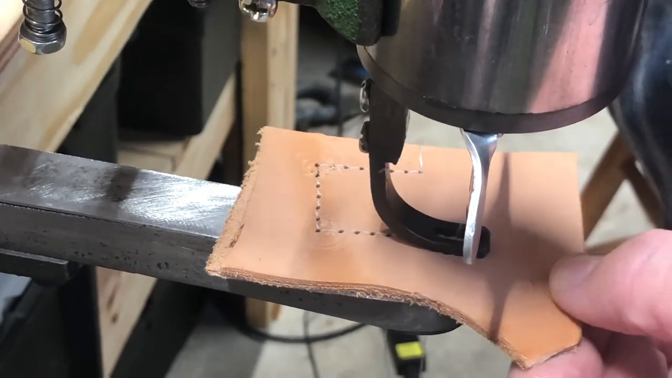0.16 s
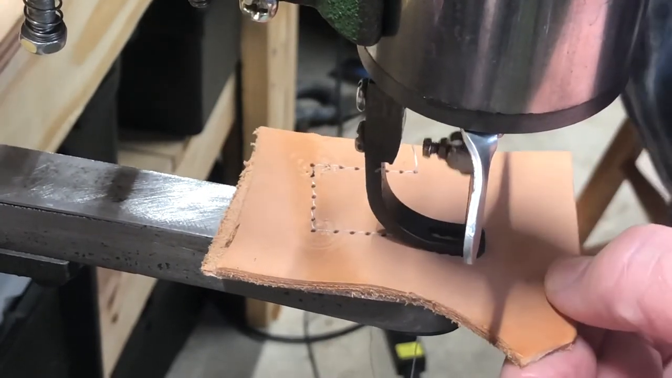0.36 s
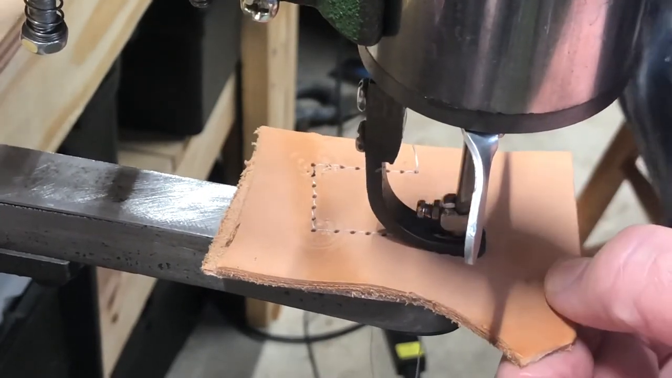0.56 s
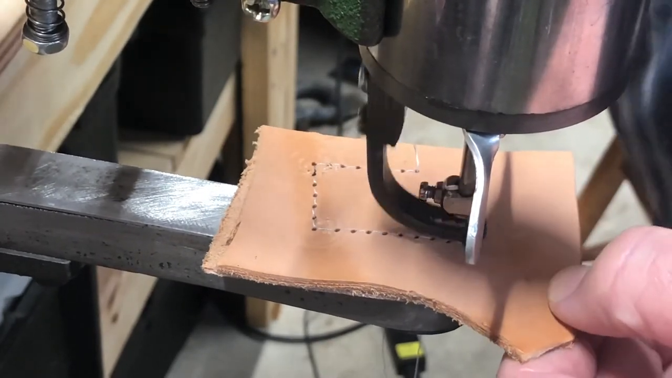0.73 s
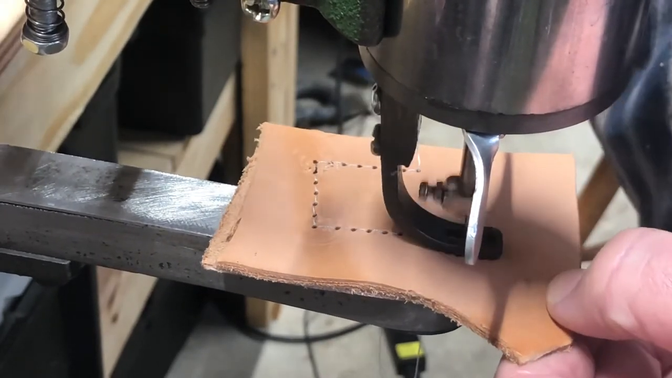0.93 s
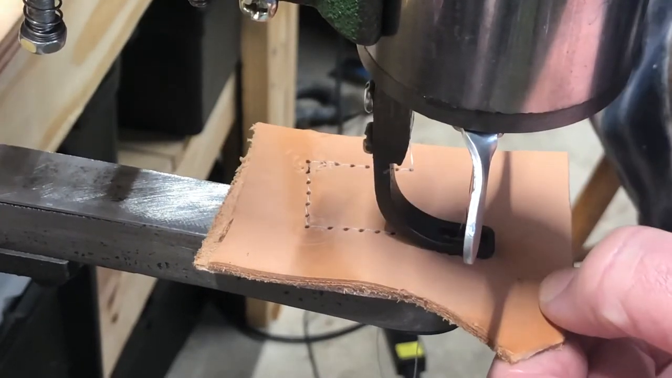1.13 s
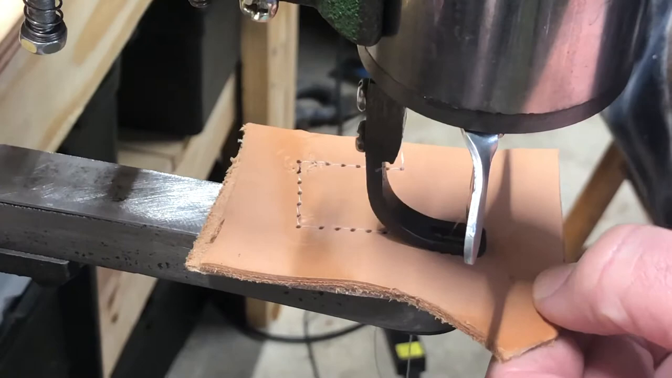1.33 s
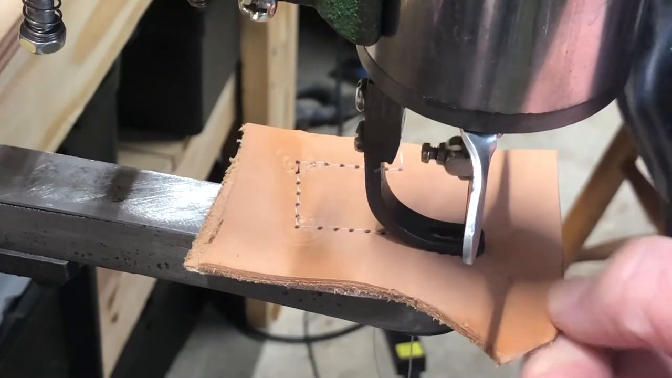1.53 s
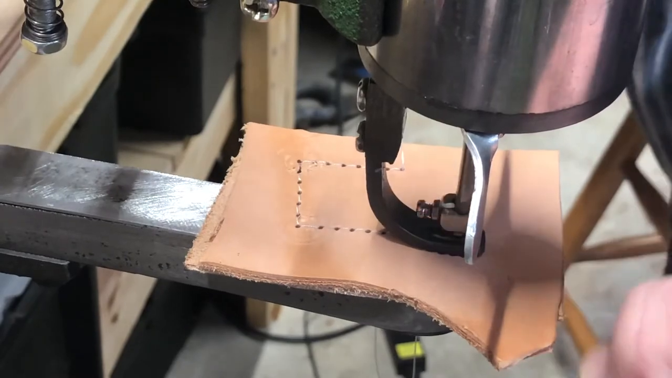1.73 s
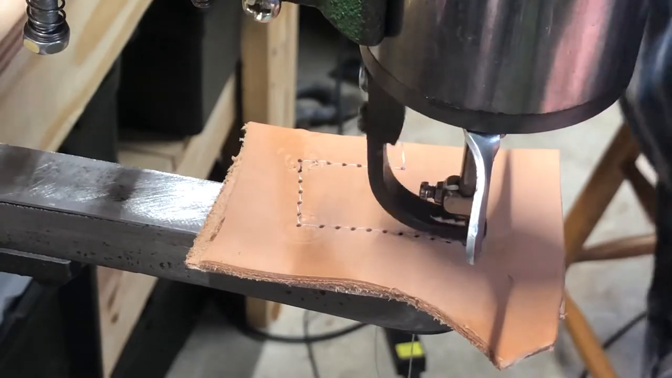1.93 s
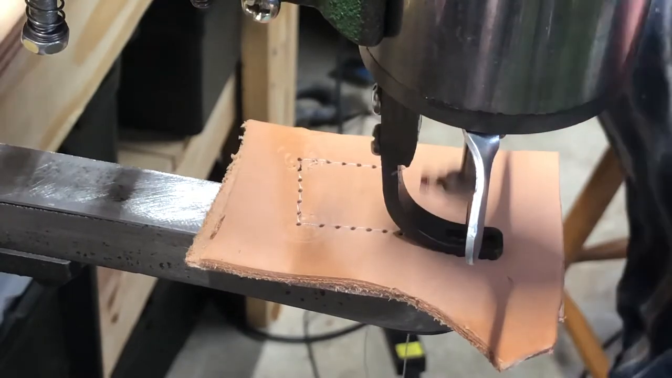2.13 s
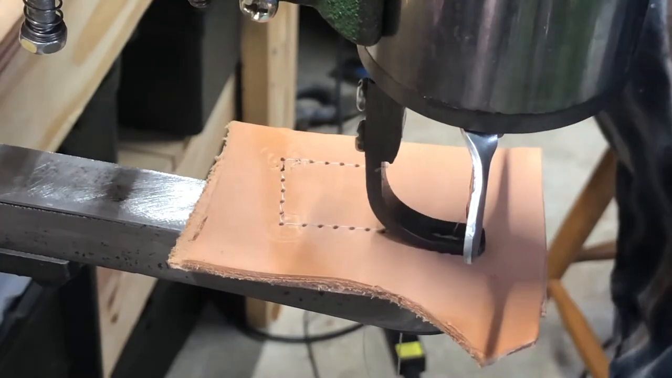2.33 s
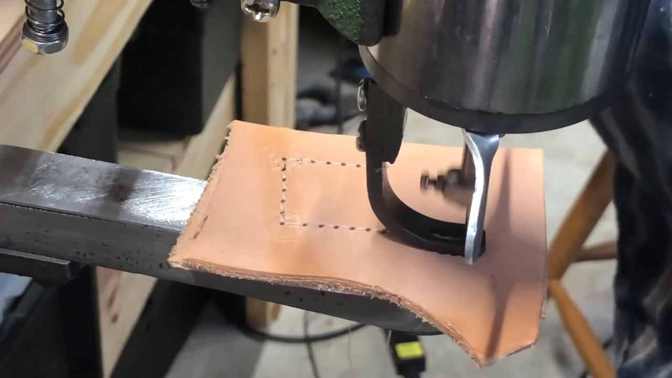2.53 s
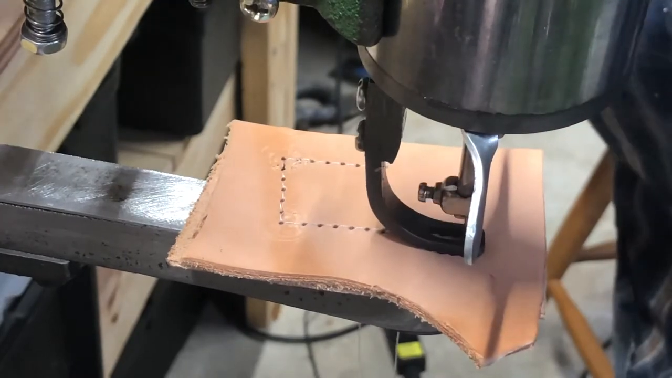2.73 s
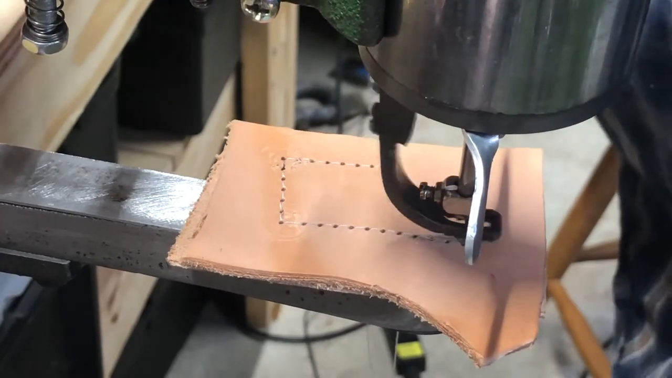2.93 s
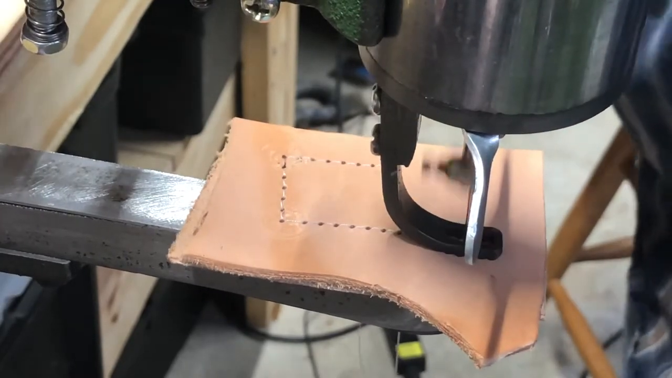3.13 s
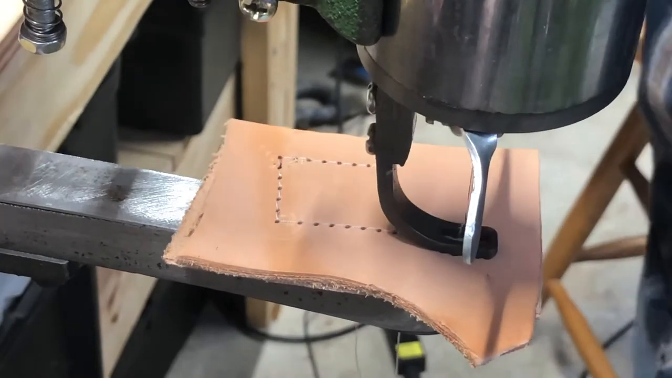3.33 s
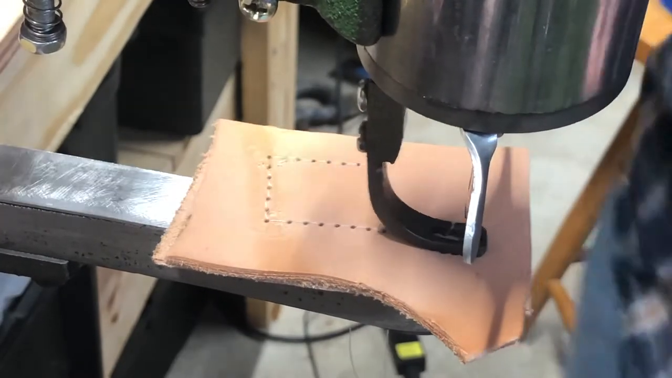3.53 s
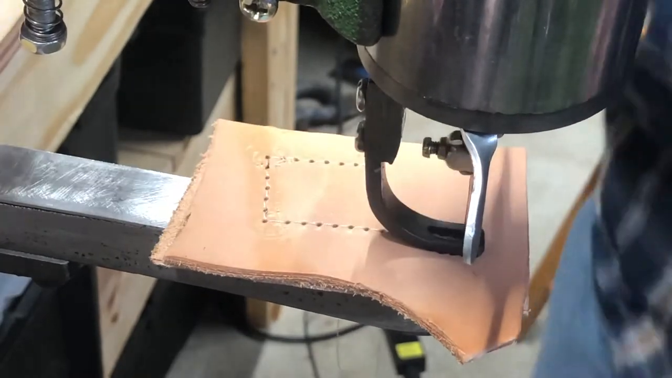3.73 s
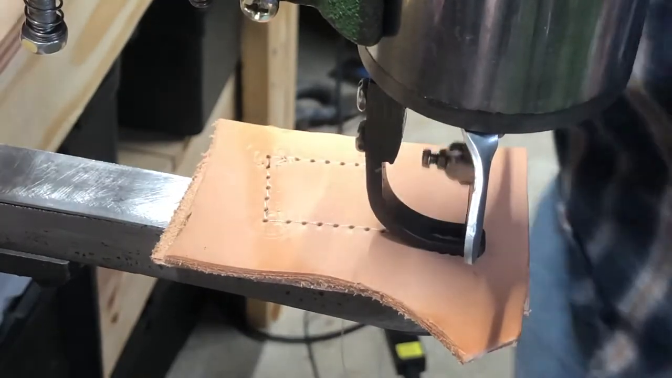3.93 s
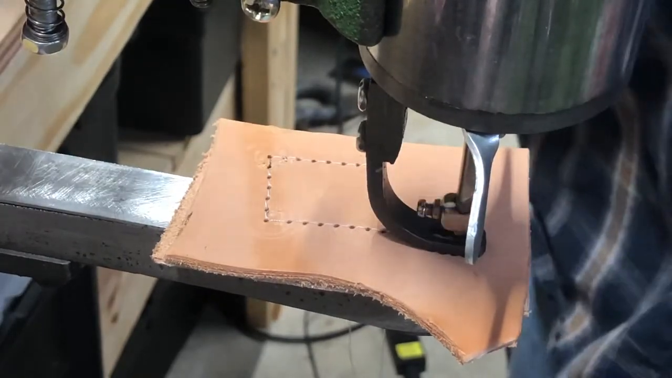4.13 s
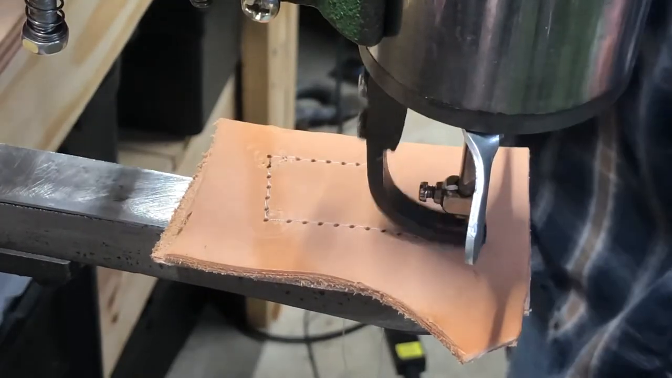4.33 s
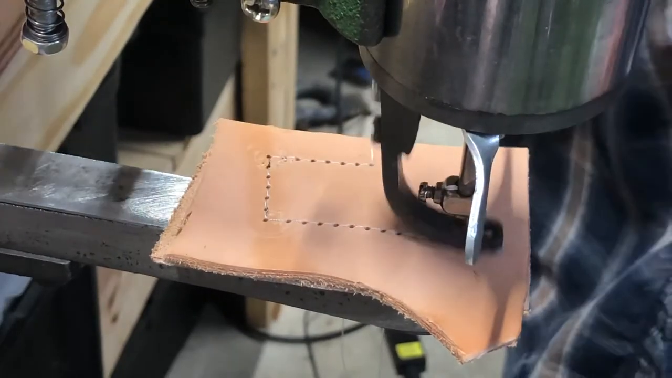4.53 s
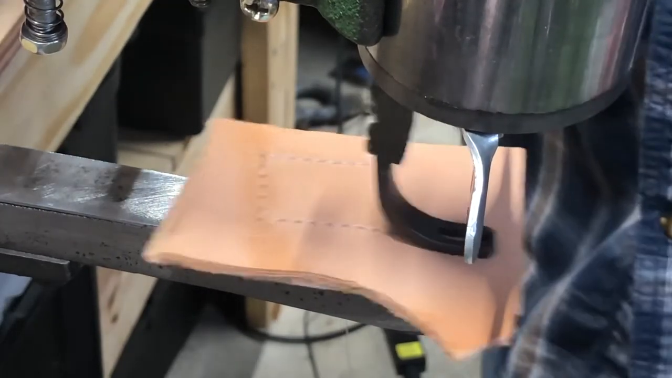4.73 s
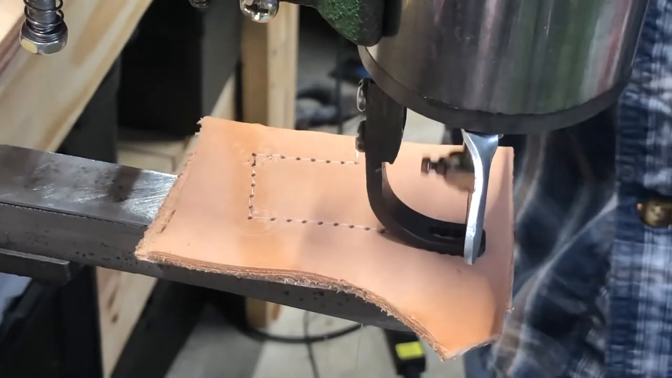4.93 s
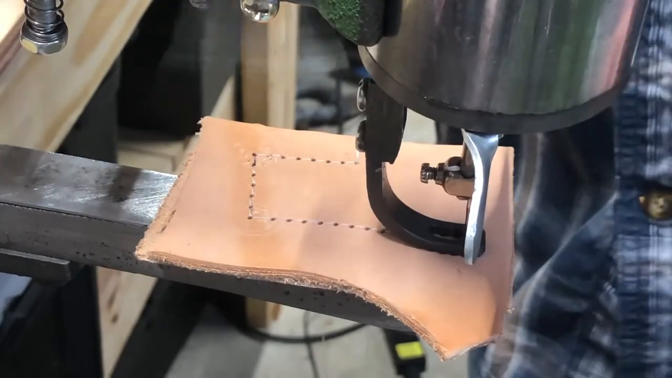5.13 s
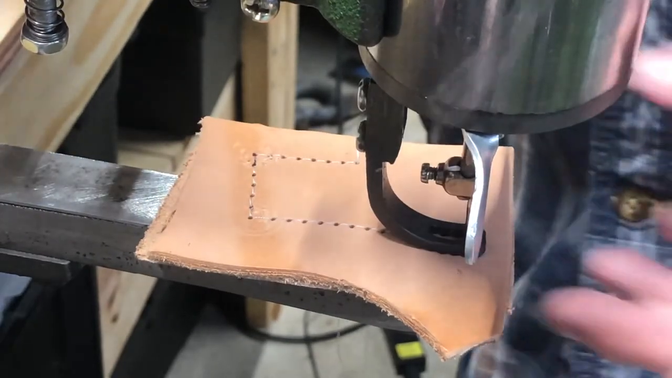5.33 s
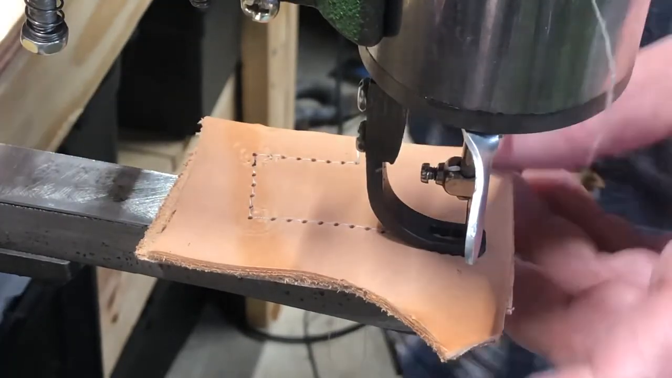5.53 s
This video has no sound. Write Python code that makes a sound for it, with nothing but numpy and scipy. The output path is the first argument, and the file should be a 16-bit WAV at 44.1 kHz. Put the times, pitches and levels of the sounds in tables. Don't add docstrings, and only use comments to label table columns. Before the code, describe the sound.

Close rhythmic metal clacking and gritty roller grinding, one heavy stroke per stitch, with small spring pings over a low room hum.

```python
import sys
import numpy as np
from scipy import signal
from scipy.fft import rfft, irfft, next_fast_len
from scipy.io import wavfile
from scipy.ndimage import uniform_filter1d, map_coordinates

SR = 44100
rng = np.random.default_rng(int(sys.argv[2]) if len(sys.argv) > 2 else 0)


def dump(signal):
    limited = np.clip(np.atleast_2d(signal).T, -1, 1)
    pcm = np.round(limited * 32767).astype(np.int16)
    wavfile.write(sys.argv[1], SR, pcm)


def gain_from_decibels(decibels):
    exponent = np.asarray(decibels, float) / 20
    return 10 ** exponent


N = 245637

# frequency in Hz, width in Hz, level in dB.
FRAME_MODES = [(305.7, 39, -1.5), (447, 78, -0.5), (543.4, 40.6, 1), (666, 119, -2), (863, 143, -3.5),
               (1140, 88, -3.5), (1470, 1000, -20)]


def unit(x):
    return x / np.sqrt(np.mean(x ** 2) + 1e-20)


def along(points, hz):
    f, v = np.transpose(points)
    return np.interp(np.log(hz + 1), np.log(f + 1), v)


def wobble(rate_hz):
    knots = rng.standard_normal(int(N * rate_hz / SR) + 4)
    return map_coordinates(knots, [np.arange(N) * rate_hz / SR])


def filtered(x, response):
    m = next_fast_len(N + SR // 2)
    return irfft(rfft(x, m) * response(np.fft.rfftfreq(m, 1 / SR)), m)[..., :N]


def resonant(modes):
    def response(f):
        total = 0
        for k, (center, width, db) in enumerate(modes):
            damping = 1j * f * width
            total = total + (-1) ** k * gain_from_decibels(db) * damping / (center * center - f * f + damping)
        return total / np.sqrt(np.mean(np.abs(total) ** 2))
    return response


def gritty(rate_hz, lump_db):
    return unit(gain_from_decibels(lump_db * wobble(rate_hz)) * rng.standard_normal(N))


def patchy(x, patch_db, size):
    z = signal.stft(x, nperseg=size)[2]
    field = uniform_filter1d(rng.standard_normal(z.shape), size=4, axis=0)
    field = uniform_filter1d(field, size=5, axis=1)
    return unit(signal.istft(z * gain_from_decibels(patch_db * unit(field)), nperseg=size)[1][:N])


def room_tone():
    # frequency in Hz, density in dB per Hz.
    tone_spectrum = [(12, -64), (20, -49), (37, -30), (53, -10.5), (72, -0.5), (88, -15), (101, -25),
                     (366, -29), (457, -35), (588, -38), (946, -43.5), (7270, -50.5), (15900, -56.5)]
    level_db = -51 + 1.8 * wobble(4)
    air = filtered(rng.standard_normal(N), lambda hz: gain_from_decibels(along(tone_spectrum, hz)))
    return gain_from_decibels(level_db) * unit(air)


def walls(x):
    # frequency in Hz, t60 in seconds.
    wall_t60 = [(300, 0.24), (3000, 0.025), (12000, 0.049)]
    delay = 250
    hz, t, z = signal.stft(rng.standard_normal(SR // 2), SR, nperseg=256)
    decay = gain_from_decibels(-60 * t / along(wall_t60, hz)[:, None])
    tail = signal.istft(z * decay, SR, nperseg=256)[1]
    return signal.fftconvolve(np.pad(x, (delay, 0)), tail / np.linalg.norm(tail))[:N]


def thread():
    # time in seconds, peak in dB.
    snap = [(5.3134, -30)]
    (s, db), = snap
    t = np.arange(N) / SR - s
    return -gain_from_decibels(db) * np.exp(-(t / .00033) ** 2) * np.cos(2 * np.pi * 1950 * t)


def effort():
    # start of hold in seconds, hold in seconds, grind in dB, scrape over grind in dB.
    feed = [(.13, 0.079, -42, -11.5), (1.265, 0.079, -43, -11), (2.27, 0.059, -37.5, -9.5),
            (3.49, 0.069, -41, -12.5), (4.71, 0.073, -42, -10)]
    lift = [(.4, 0.08, -43.5, -17), (1.545, 0.0067, -44.5, -12.5), (2.47, .03, -45.5, -15),
            (3.37, 0.055, -55.5, -3.5), (3.9, 0.012, -50.5, -23), (4.635, 0.036, -42.5, -2.5)]
    pierce = [(.505, 0.089, -31.5, -14.5), (1.675, 0.11, -34.5, -14.5), (2.555, 0.13, -35, -15),
              (4.11, 0.13, -37, -13)]
    pull = [(.68, 0.25, -36, -14), (1.91, 0.19, -35, -11), (2.915, 0.18, -36, -13),
            (4.32, 0.29, -36.5, -25.5)]
    brush = [(0, 0.0046, -52.5, -12), (3.22, 0.11, -64.5, -1.5), (3.64, 0.33, -60.5, -4),
             (5.09, 0.26, -65, 2.5), (5.53, 0.043, -77, -1)]
    # strokes, rise in dB/s, growth in the hold in dB/s, fall in dB/s.
    strokes = [(feed, 170, 42, 200), (lift, 345, 22, 150), (pierce, 300, 49, 198),
               (pull, 72, 16.1, 206), (brush, 120, 1.2, 280)]
    t = np.arange(N) / SR
    power = np.full((2, N), 1e-9)
    for rows, rise, growth, fall in strokes:
        for s, hold, db, scrape_db in rows:
            shape_db = rise * np.minimum(t - s, 0)
            shape_db += growth * np.clip(t - s, 0, hold)
            shape_db -= fall * np.maximum(t - s - hold, 0)
            power += gain_from_decibels(db + np.c_[[0, scrape_db]] + shape_db) ** 2
    return 10 * np.log10(power)


def crank():
    # frequency in Hz, width in Hz, level in dB.
    bench_modes = [(122, 12, 0), (187, 20, -8), (234, 26, -6)]
    idle_modes = [(344, 77, -2.5), (541, 141, -3.5), (718, 135, -1.5), (987, 290, -10.5), (1123, 52, -5.5),
                  (1434, 240, -19)]
    roller_modes = [(1960, 91, 10), (2623, 45, 19), (3610, 47, 13), (5250, 180, 12.5), (5950, 83, -52.5),
                    (8600, 350, -4.5)]
    # frequency in Hz, density in dB per Hz.
    scrape_spectrum = [(820, -19), (1400, 0), (1610, -9.5), (2060, -4.5), (2380, -5), (3430, -6),
                       (3690, -8.5), (6260, -12.5), (7220, -18.5), (9230, -15), (10400, -22), (14000, -27),
                       (16000, -23)]
    bench_level_db, bench_share, bench_lag_s = -44.5, .6, 0.016

    grind_db, scrape_db = effort()
    t = np.arange(N) / SR
    rolling = patchy(gritty(300, lump_db=4), patch_db=2.5, size=1024)
    rolling = gain_from_decibels(grind_db - 1.1 + 1.2 * wobble(22)) * rolling
    load = np.clip((grind_db + 41) / 7, 0, 1)
    grind = filtered(np.sqrt(load) * rolling, resonant(FRAME_MODES))
    grind += filtered(np.sqrt(1 - load) * rolling, resonant(idle_modes))

    bench_db = bench_level_db + bench_share * (np.interp(t - bench_lag_s, t, grind_db) + 41.5)
    bench = filtered(gain_from_decibels(bench_db) * gritty(37, lump_db=1.5), resonant(bench_modes))
    bench = filtered(bench, lambda hz: 1 / (1 + (108 / (hz + 1)) ** 12))

    rubbing = patchy(gritty(450, lump_db=1), patch_db=3.0, size=384)
    rubbing = gain_from_decibels(scrape_db - 2.0 + 1.85 * wobble(30)) * rubbing
    hiss = filtered(rubbing, lambda hz: unit(gain_from_decibels(along(scrape_spectrum, hz))))
    squeak = filtered(rubbing, resonant(roller_modes))
    return grind + bench + gain_from_decibels(0.77) * hiss + gain_from_decibels(-6.5) * squeak


def pings():
    # time in seconds, peak in dB.
    leaf_pings = [(.1216, -40), (.1594, -39), (0.555, -25), (.7114, -49), (.7821, -43), (.9304, -32),
                  (1.2514, -44), (1.3428, -39), (1.7366, -24), (1.9674, -45), (2.1076, -29), (2.1364, -46),
                  (2.6209, -28), (2.9447, -40), (3.0994, -35), (3.1517, -46), (3.4955, -45), (4.1824, -34),
                  (4.4638, -36), (4.7102, -34)]
    # time in seconds, peak in dB.
    springs = [ (11100, 600, 0.09, [(.9654, -29.5), (2.1276, -29), (3.1467, -43)]),
               (7700, 120, .067, [(.161, -45), (.2024, -49), (2.2742, -42), (2.2902, -48), (2.3092, -49),
               (3.5124, -40)]), (16100, 499, 0.064, [(2.2508, -36), (4.6134, -15)]),
               (1380, 170, 0.21, [(5.125, -43), (5.172, -53)]), (1230, 570, 0.16, [(.7054, -20),
               (1.8964, -22.5), (4.3754, -30)]), (120.3, 18, 0.44, [(.50, -25), (.93, -29), (1.53, -33),
               (2.10, -26), (2.55, -29), (2.78, -27.5), (2.93, -31), (3.07, -35), (4.78, -29)]),
               (3410, 175, 0.45, [(2.5471, -36), (2.8374, -57), (4.5144, -36.5), (5.1188, -67)]),
               (191, 83, 0.23, [(.0, -38), (2.03, -23.5), (3.88, -31.5)]), (576, 48, 0.34, [(2.19, -49),
               (3.17, -44)]), (6480, 450, .17, [(2.5694, -48), (4.1444, -47)]), ]
    out = np.zeros(N)
    t = np.arange(SR // 4) / SR
    for hz, width_hz, t60_s, hits in [(13740, 270, .11, leaf_pings)] + springs:
        shake = np.zeros(N + SR)
        for s, db in hits:
            start = round(s * SR)
            shake[start:start + len(t)] += gain_from_decibels(db - 10 - 60 * t / t60_s) * rng.standard_normal(len(t))
        mode = resonant([(hz, width_hz, 0)])
        out += filtered(shake[:N], lambda f: mode(f) ** 2 / np.sqrt(np.mean(np.abs(mode(f)) ** 4)))
    return out


def clacks():
    # frequency in Hz, width in Hz, level in dB.
    arm_modes = [(1824, 68, -2), (2080, 120, -3), (2782, 750, -6.5)]
    lever_modes = [(3324, 160, 0.5), (4620, 1100, -3), (5470, 150, -3.5)]
    steel_modes = [(5580, 520, 2.5), (6670, 870, 4.5), (7220, 460, 5.5), (8380, 930, 4)]
    leaf_modes = [(10580, 1100, 0.71), (13200, 1400, 0.13), (14300, 260, 0.97), (14600, 290, 0.2)]
    # time in seconds, steel peak in dB, weight (knock over steel) in dB.
    latch = [(.3792, -32.5, -4.5), (1.519, -28.5, -7.5), (2.4171, -28.5, -10.5), (3.9038, -34.5, -6)]
    hook = [(.7046, -18.5, -10.5), (1.8949, -21, -8.5), (2.8307, -34.5, 2.5), (4.3732, -27, -5.5)]
    needle = [(.5806, -22.5, 7.2), (1.7633, -19.5, 3.5), (2.647, -18.5, 1.1), (4.2, -19.5, 2.1)]
    foot = [(.9202, -11, -10.5), (2.0889, -7, -17), (3.0844, -13, -12), (4.6083, -9.5, -29)]
    slam = [(4.6036, -28, 4.5), (4.6136, -10, -8.5), (4.6215, -18, -9), (4.6275, -29.5, 0)]
    feed_ticks = [(.112, -43.5, 2), (.118, -41, -4), (.1559, -43, 1), (.2032, -41, -3), (.2204, -44, -11),
                  (1.221, -55, -9), (1.2437, -37, -10), (1.299, -45, -2), (1.3098, -43, -8),
                  (1.3203, -37, -1), (1.3427, -36.5, -20), (2.2445, -33.5, -19), (2.274, -36, -14),
                  (2.2897, -48, -1.2), (2.2998, -37, -24), (2.3081, -31.5, -13), (3.465, -33.5, -15),
                  (3.512, -43, -4), (3.5525, -37.5, 0), (3.5761, -41, -11), (3.5928, -44, -10),
                  (4.7094, -41, -10), (4.7432, -38, -9), (4.7589, -34.5, -1.2)]
    pierce_ticks = [(.4867, -37, 6), (.55, -26.5, -10), (.574, -35, -12), (.595, -27.5, -2),
                    (.6506, -27.5, -3), (1.6583, -36, 4.5), (1.7327, -31, -4), (1.753, -39, -6),
                    (1.8305, -26.5, -11.5), (2.6114, -35, 6.5), (2.616, -33, 1), (2.658, -28, 1),
                    (2.7094, -28.5, -16), (4.1677, -30.5, -3.3), (4.187, -36, 1.2), (4.2526, -38, -10)]
    pull_ticks = [(.7466, -42, -5), (.7691, -33, 0), (.9626, -35.5, -11), (2.0382, -25.5, 0),
                  (2.125, -32, -19), (2.896, -32.5, -10), (2.9216, -34.5, -1.2), (3.005, -27.5, 0),
                  (3.1458, -43.5, 2.5), (4.339, -34, -20.5), (4.4044, -45.5, 1.5), (4.4504, -38, -0.5),
                  (4.4567, -31.5, -4), (4.572, -39.5, 8.5), (4.59, -38, -6)]
    link_ticks = [(.5422, -44, -5.5), (.791, -40, 2), (.8215, -48, 13), (.8388, -28, -5),
                  (.8875, -43.5, 12), (1.1678, -58, -17), (1.7264, -35.5, 3), (1.9393, -50, -17.5),
                  (1.957, -30.5, -13), (1.9783, -38, 2), (2.0056, -36, 8), (2.5414, -45.5, 13),
                  (2.638, -31, -17), (2.776, -43, -16), (2.9775, -41.5, 6.5), (3.041, -46, 12),
                  (3.356, -46, -1.5), (3.3746, -45.5, -2), (4.089, -42.5, 8), (4.296, -48, -21),
                  (4.328, -38, -28), (4.4784, -36, -7), (4.5106, -46, 7.5), (4.521, -49, 15.5),
                  (4.54, -39.5, 7.5), (5.0415, -60.5, 5), (5.5465, -54.5, -2)]
    # contacts, lever over steel in dB, sizzle over steel in dB, chatter in ms.
    parts = [(latch, 0.3, -9.5, 4.5), (hook, -3.5, -15, 4.5), (needle, -4.5, -5, 1.2),
             (foot, -7, -11, 1), (slam, -1.5, -1.2, 2.1), (feed_ticks, 2.5, 2.8, 3.2),
             (pierce_ticks, 2.2, -.6, 3.4), (pull_ticks, 4.2, -1.5, 3.8), (link_ticks, 1.5, -11, 4.4)]
    lever_share = .3

    t = np.arange(SR // 8) / SR
    tail = gain_from_decibels(-7.5 - 60 * t / 0.078) * [[.8], [2.4], [1.2], [.7]]
    shake = np.zeros((4, N + SR))
    for rows, lever_db, sizzle_db, chatter_ms in parts:
        after_s = np.maximum(t - chatter_ms / 1000, 0)
        chatter = gain_from_decibels(-600 * t - 60 * after_s / 0.004)
        chatter = chatter + 0.55 * gain_from_decibels(-60 * t / 0.0022)
        for s, db, weight_db in rows:
            body_db = np.c_[[0, weight_db, lever_db + lever_share * weight_db, sizzle_db]]
            signs = np.sign(rng.standard_normal((4, len(t))))
            start = round(s * SR) + SR // 1000
            shake[:, start:start + len(t)] += gain_from_decibels(db - 13.0 + body_db) * (chatter + tail) * signs
    steel, knock, lever, sizzle = shake[:, :N]
    thud = gain_from_decibels(0.5) * filtered(knock, resonant(FRAME_MODES)) + filtered(knock, resonant(arm_modes))
    ring = filtered(lever, resonant(lever_modes)) + filtered(steel, resonant(steel_modes))
    return thud + ring + filtered(sizzle, resonant(leaf_modes))


def scene():
    machine = crank() + clacks() + pings() + thread()
    return (machine + gain_from_decibels(-12.5) * walls(machine) + room_tone())[None]


def band_limit(x):
    return signal.sosfilt(signal.butter(12, 16820, fs=SR, output="sos"), x)


def record(dry):
    top_hz, ceiling = 15850, .45
    x = filtered(dry, lambda hz: gain_from_decibels(-30 * np.clip((hz - top_hz) / 150, 0, 1)))
    x = x / (1 + np.abs(x / ceiling) ** 4) ** (1 / 4)
    return band_limit(x)


dry = scene()
out = record(dry)
dump(out)
```